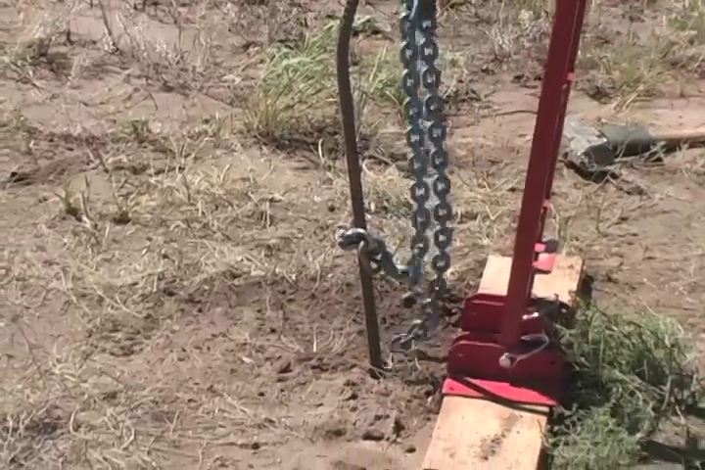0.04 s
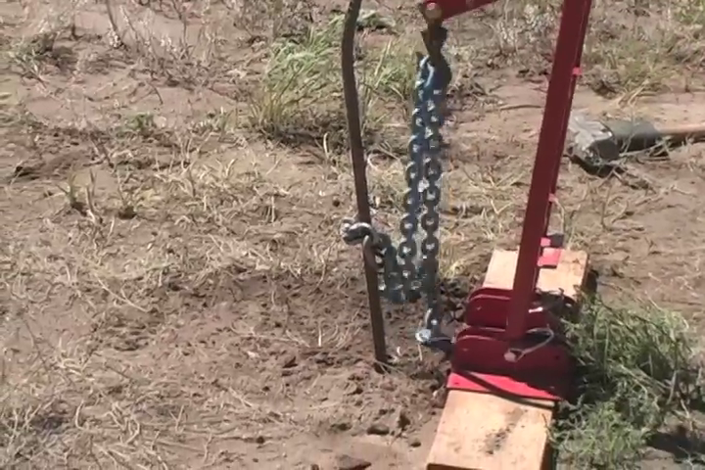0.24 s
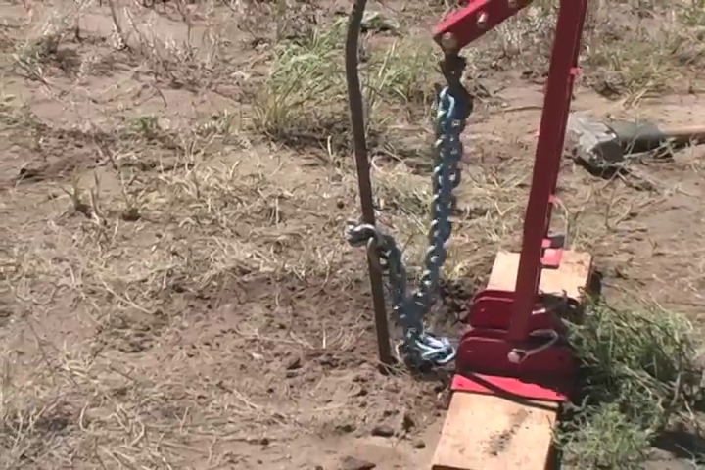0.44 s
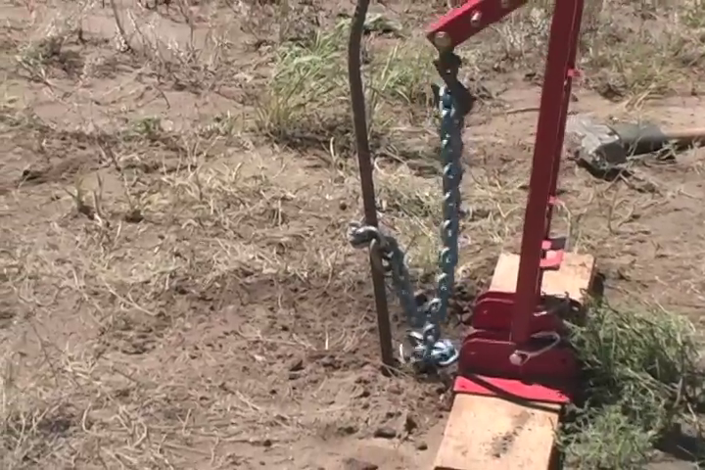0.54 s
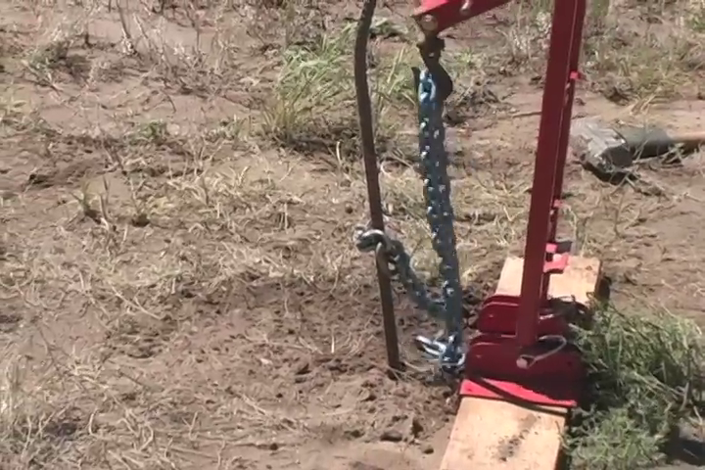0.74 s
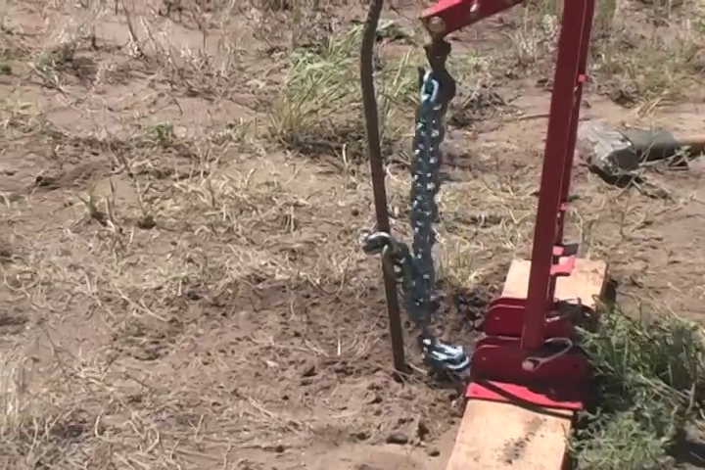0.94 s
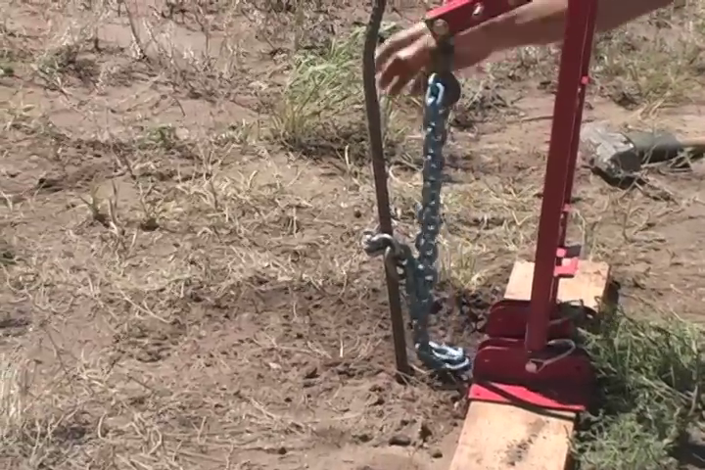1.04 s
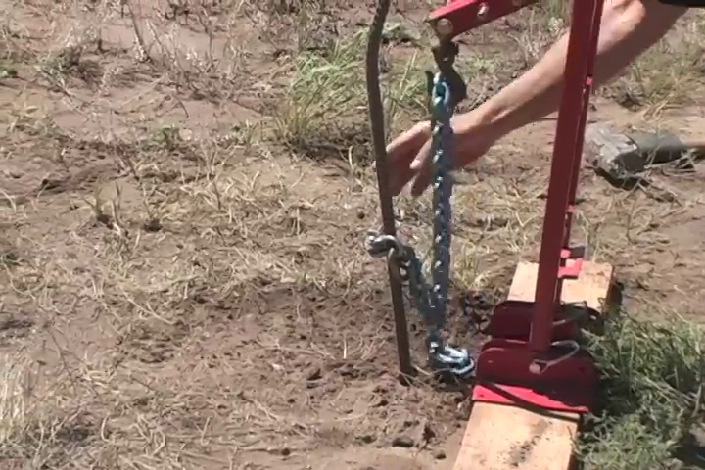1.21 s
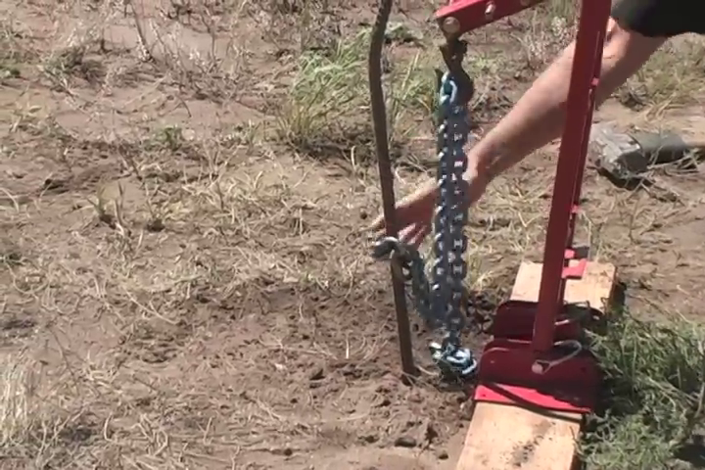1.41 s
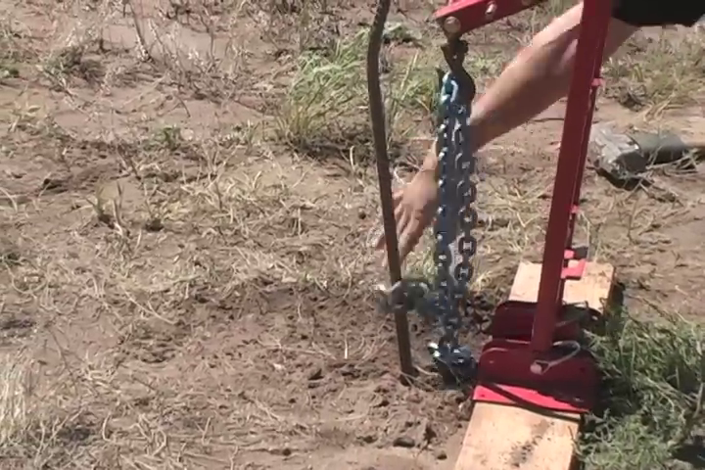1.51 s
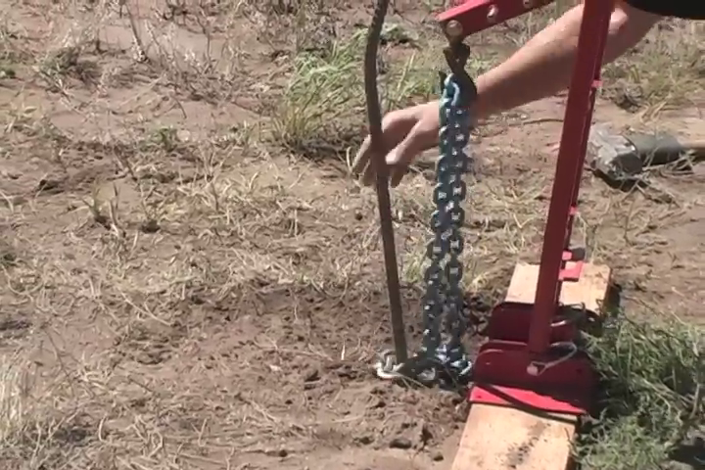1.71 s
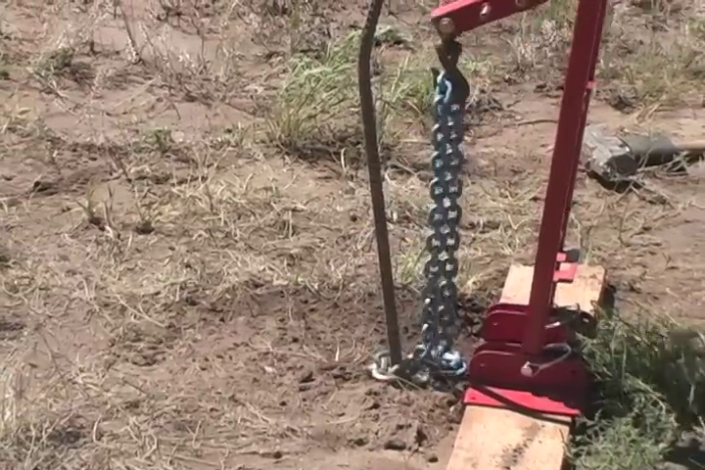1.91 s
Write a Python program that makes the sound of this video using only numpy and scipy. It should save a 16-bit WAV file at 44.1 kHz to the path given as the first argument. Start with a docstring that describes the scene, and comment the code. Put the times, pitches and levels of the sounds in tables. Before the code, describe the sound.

A steel chain drops slack, clinking and rattling against a metal jack and rod outdoors.

```python
"""A steel chain goes slack between a farm jack and a ground rod, outdoors on dry soil.
Its links drop in one crash, then clink: each hit is a crack, a chatter of rebounds and a dense ring.
Hook, jack and rod ring on in their own modes, over dry ticks of grit and a faint sliding hiss.
Afterwards a hand shifts the chain softly and a foot steps on the soil.
Behind it, in quiet open air, a small bird chirps and an engine hums far away."""
import sys
import numpy as np
from scipy import signal
from scipy.fft import rfft, irfft
from scipy.io import wavfile

SR = 44100
rng = np.random.default_rng(int(sys.argv[2]) if len(sys.argv) > 2 else 0)


def persist_wave(psi):
    """Save psi, clipped to +-1, as 16-bit WAV."""
    counts = np.round(np.clip(psi, -1, 1) * 32767).astype(np.int16)
    wavfile.write(sys.argv[1], SR, np.atleast_2d(counts).T)


N = 85995

# Edges of the five bands that voice each clink: f/Hz
BAND_EDGES_HZ = [450, 1500, 3000, 5000, 7500, 15000]
# Link hits, from crash to soft shift: t/s, relative level/dB, five band levels/dB, chatter t60/s
LINK_HITS = [(0.106, -34, -16.5, -13, -12, -12, -19, 0.22),
             (0.183, -30.5, -24, -11, -22, -11.5, -30, 0.073),
             (0.2289, -9, -29.5, -11, -33, -10, -14, 0.05),
             (0.2395, -12, -29.5, -24, -6.5, -9.5, -12, 0.15),
             (0.2536, -8.5, -27.5, -11.5, -15.5, -10, -16.5, 0.09),
             (0.2648, -14, -23, -17.5, -13.5, -10.5, -17, 0.11),
             (0.2878, -17, -23, -12.5, -10.5, -15, -25, 0.17),
             (0.3482, -16, -31.5, -16.5, -12, -41, -20.5, 0.045),
             (0.3701, -27.5, -12.5, -3, -16, -3.5, -34, 0.033),
             (0.3834, -16.5, -21.5, -14, -11, -7.5, -18.5, 0.085),
             (0.403, -24, -17, -12.5, -5, -32, -17, 0.1), (0.4482, -33.5, -12.5, -30, -20, -15, -25, 0.09),
             (0.4713, -14.5, -25, -21, -12, -9, -8.5, 0.1), (0.5644, -22, -15, -11.5, -7.5, -7, -17, 0.084),
             (0.5701, -14.5, -29, -17.5, -12.5, -14.5, -13, 0.1),
             (0.6049, -35.5, -17, -13, -11, -4, -9, 0.13),
             (0.634, -14.5, -34, -22, -18, -22.5, -22.5, 0.13),
             (0.6686, -29, -13.5, -5, -3.5, -7.5, -19, 0.15),
             (0.6999, -28.5, -17.5, -6.5, -24, -10, -15.5, 0.15),
             (0.716, -26, -15, -45, -6, -26, -5, 0.062), (0.7179, -15, -34, -23, -31, -8.5, -21, 0.066),
             (0.7627, -28.5, -12.5, -5.5, -42, -6.5, -20, 0.039),
             (0.8181, -31.5, -11.5, -10, -5.5, -10.5, -32, 0.074),
             (0.924, -21.5, -28, -9, -7, -7, -13, 0.075), (0.9266, -21.5, -17, -15, -11, -21, -14, 0.14),
             (1.001, -31, -13.5, -13.5, -5, -7, -19, 0.067),
             (1.4664, -36.5, -25.5, -33, -10.5, -18, -22, 0.068),
             (1.4861, -38.5, -21.5, -24.5, -6.5, -14, -24.5, 0.078),
             (1.5021, -35, -20.5, -32, -16.5, -18, -24.5, 0.051),
             (1.8992, -46, -36, -14, -7.5, -10, -31, 0.055)]
LINK_MODE_COUNT, CLINK_TRIM_DB = 140, -13.5
DETUNE = .012  # share by which a contact shifts the link modes


def chain():
    """Every collision excites the same crowd of link modes in a new mixture."""
    out = np.zeros(N)
    place = (np.arange(LINK_MODE_COUNT) + rng.random(size=LINK_MODE_COUNT)) / LINK_MODE_COUNT
    link_hz = BAND_EDGES_HZ[0] + (BAND_EDGES_HZ[-1] - BAND_EDGES_HZ[0]) * place ** 1.3
    for start, db, *band_db, t60 in LINK_HITS:
        detuned_hz = link_hz * (1 + DETUNE * rng.standard_normal(len(link_hz)))
        add(out, start, undb(db + CLINK_TRIM_DB) * clink(t60, band_db, detuned_hz))
    return out


# Bright steel EQ shared by all clinks: f/Hz, level/dB
CLINK_EQ = [(300, -20.5), (500, -7.5), (750, -6), (1100, -1.5), (2500, -2.5), (4000, 13.5), (6000, 1),
            (7300, 2.5), (8600, -2.5), (10000, 0.5), (12500, -1), (14000, -8), (16000, -25.5)]
ATTACK_S, CRACK_DB, CRACK_T60_S = 0.0013, 7.5, 0.004
CHATTER_DB, CHATTER_PER_S, CHATTER_SPREAD_DB = 3.5, 1100, 3.5
RING_STRETCH = 1.13  # the links ring about this many times as long as they chatter
TREBLE_DAMPING = 0.06  # higher link modes die sooner, as this power of frequency


def clink(t60, band_db, link_hz):
    """One collision: a crack, a chatter of tiny rebounds and the dense ring of the links."""
    t = np.arange(SR // 4) / SR
    strength, stretch, phase = rng.standard_normal((3, len(link_hz), 1))
    waves = np.sin(2 * np.pi * (link_hz[:, None] * t + phase))
    damping = (link_hz[:, None] / np.median(link_hz)) ** -TREBLE_DAMPING
    mode_t60 = t60 * RING_STRETCH * damping * np.exp(0.22 * stretch)
    ring = (strength * waves * fade(t, mode_t60)).sum(0) / np.sqrt(len(link_hz) / 2)
    contacts = rng.random(len(t)) < CHATTER_PER_S / SR
    rebounds = contacts * undb(CHATTER_SPREAD_DB * rng.standard_normal(len(t)))
    polarity = np.sign(rng.standard_normal(len(t)))
    chatter = undb(CHATTER_DB) * unit(rebounds * polarity) * fade(t, t60)
    crack = undb(CRACK_DB) * rng.standard_normal(len(t)) * fade(t, CRACK_T60_S)
    attack = 1 - np.exp(-t / ATTACK_S)
    hit = colour((ring + chatter + crack) * attack, CLINK_EQ)
    out = 0
    for lo, hi, db in zip(BAND_EDGES_HZ, BAND_EDGES_HZ[1:], band_db):
        band = signal.sosfilt(signal.butter(3, [lo, hi], "band", fs=SR, output="sos"), hit)
        out = out + undb(db) * band / np.std(band[:SR // 60])  # the onset sets the band's level
    return out


def struck_steel(modes, blows):
    """A steel part rings with its own modes, a little differently at each blow."""
    out, t = np.zeros(N), np.arange(SR * 3 // 4) / SR
    attack = 1 - np.exp(-t / ATTACK_S)
    for start, db in blows:
        variation = rng.standard_normal((len(modes), 2))
        ring = sum(undb(db + mode_db + jitter_db) * np.sin(2 * np.pi * (hz * t + phase)) * fade(t, t60)
                   for (hz, mode_db, t60), (jitter_db, phase) in zip(modes, variation))
        add(out, start, ring * attack)
    return out


# Ringing modes of the links, the hook and the jack's parts: f/Hz, relative level/dB, t60/s
LINK_MODES = [(2293, -9, 0.14), (3002, -26, 0.088), (3697, 2.5, 0.088), (3580, 0.5, 0.05),
              (4060, -1.5, 0.1), (4257, -5.5, 0.076), (4355, -7.5, 0.16), (4400, -15, 0.083),
              (5630, -16, 0.13), (5790, -5, .21), (6124, -6.5, .16), (6400, -3, 0.11), (7531, -21.5, 0.15),
              (13240, -11.5, 0.14)]
LOOSE_LINK_MODES = [(3710, -9, 0.046), (4770, 1, 0.023), (5010, -7.5, 0.066), (5870, 1, 0.024),
                    (6740, -4.5, 0.032), (8470, -13, 0.068), (9970, -8.5, 0.059)]
HOOK_MODES = [(1927, -17, 0.4), (5240, -15.5, 0.08), (5930, 4.5, 0.041), (6740, -7, 0.121),
              (10370, 2.5, 0.027), (12020, -22, 0.13)]
JACK_BASE_MODES = [(519, -12, .09), (981, -8.5, 0.084), (1143.4, 3.5, 0.091), (1300, -16, 0.064)]
JACK_ARM_MODES = [(2000, 2.5, 0.1435), (2620, -6.5, 0.067), (2940, 7, 0.17), (4290, -16.5, .07)]
JACK_POST_MODES = [(780, -15, .12), (1220, -5, 0.34), (1307, -2, .17), (2040, -4, .15), (4078, -2.5, 0.094)]
# Blows that set each part ringing: t/s, level/dB
LINK_BLOWS = [(.230, -27.5), (.2545, -34), (0.3724, -37), (0.4715, -36)]
LOOSE_LINK_BLOWS = [(0.5714, -40.5), (0.6341, -25), (0.93, -32.5)]
HOOK_BLOWS = [(0.354, -38), (0.3837, -40), (0.4485, -41.5), (.5705, -34), (.607, -38)]
JACK_BASE_BLOWS = [(0.242, -39), (0.3461, -47.5), (0.4736, -38), (0.925, -52.5)]
JACK_ARM_BLOWS = [(0.4053, -47), (0.6704, -43.5)]
JACK_POST_BLOWS = [(0.183, -51.5), (0.7205, -46.5), (0.8205, -53.5)]


def hardware():
    """The falling chain knocks bright pings from links and hook, and lower clanks from the jack."""
    return (struck_steel(LINK_MODES, LINK_BLOWS)
            + struck_steel(LOOSE_LINK_MODES, LOOSE_LINK_BLOWS)
            + struck_steel(HOOK_MODES, HOOK_BLOWS)
            + struck_steel(JACK_BASE_MODES, JACK_BASE_BLOWS)
            + struck_steel(JACK_ARM_MODES, JACK_ARM_BLOWS)
            + struck_steel(JACK_POST_MODES, JACK_POST_BLOWS))


# Ringing modes of the ground rod: f/Hz, relative level/dB, t60/s
ROD_MODES = [(3348, -12.5, 0.67), (3384, 2, 0.087), (4130, -28, 0.37), (5338, -13, 0.099),
             (6200, -14, 0.19), (7447, -1, 0.2), (9930, -4, .12)]
# Blows of the chain on the rod: t/s, level/dB
ROD_BLOWS = [(.565, -42), (0.7193, -32), (0.9264, -47.5), (1.003, -58)]
ROD_CHOKE_S, ROD_CHOKE_T60_S = 1.03, .15


def ground_rod():
    """The rod rings with a long tail until the chain settles against it and chokes it."""
    since_choke = np.maximum(np.arange(N) / SR - ROD_CHOKE_S, 0)
    return struck_steel(ROD_MODES, ROD_BLOWS) * fade(since_choke, ROD_CHOKE_T60_S)


# Dry ticks: t/s, peak level/dB, brightest f/Hz
GRIT_TICKS = [(0.1088, -45.5, 7860), (0.171, -40.5, 3600), (.184, -37.5, 4800), (0.2253, -37, 4500),
              (0.2269, -33, 2970), (0.2311, -17.5, 3800), (0.2544, -18.5, 3560), (0.362, -39, 8900),
              (.387, -30.5, 9400), (0.4061, -24, 3000), (.4732, -32, 4900), (0.6359, -22, 5500),
              (.679, -42, 10600), (0.69, -40, 10000), (0.7202, -16.5, 4370), (.830, -43, 11100),
              (.859, -40, 7900), (.866, -40, 7400), (1.057, -49, 5460), (1.1035, -42, 12600),
              (1.109, -43, 12600), (1.339, -44.5, 7000), (1.47, -46.5, 4170), (1.487, -55.5, 4000),
              (1.504, -46.5, 4300), (1.603, -53.5, 6000)]
TICK_Q, TICK_T60_S = 1.7, .0065


def grit():
    """Grit and hard contacts give tiny noise bursts, each with a broad resonance."""
    out, t = np.zeros(N), np.arange(SR // 20) / SR
    for start, db, hz in GRIT_TICKS:
        burst = rng.standard_normal(len(t)) * fade(t, TICK_T60_S)
        b, a = signal.iirpeak(hz, TICK_Q, fs=SR)
        tick = signal.lfilter(b, a, signal.lfilter(b, a, burst))
        add(out, start, undb(db) * tick / np.abs(tick).max())
    return out


# Envelope of the sliding hiss: t/s, level/dB
SLIDE_ENVELOPE = [(0, -79.5), (.6, -59.5), (1.0, -70.5), (1.1, -68), (1.36, -67), (1.45, -73),
                  (1.55, -85.5), (1.95, -74.5)]
# EQ of the sliding hiss: f/Hz, level/dB
SLIDE_EQ = [(1000, -9.5), (3000, -6.5), (5000, 2.5), (7500, -2.5), (11000, -7.5), (15000, -9)]


def slide():
    """A faint, bright hiss swells and ebbs as the chain slides."""
    return curve(SLIDE_ENVELOPE) * unit(colour(rng.standard_normal(N), SLIDE_EQ))


STEP_AT_S, STEP_DB, STEP_HZ, STEP_SWELL_S = 1.447, -62, 235, 0.014


def footstep():
    """A soft step on soil: one dull pulse of low noise."""
    swell = np.exp(-((np.arange(N) / SR - STEP_AT_S) / STEP_SWELL_S) ** 2)
    return undb(STEP_DB) * swell * narrow_noise(STEP_HZ, width_hz=36)


# Bird chirps: t/s, level/dB, starting f/Hz
CHIRPS = [(0.896, -62, 5470), (1.105, -79, 5500), (1.135, -66, 5550), (1.735, -70, 5560),
          (1.763, -67.5, 5600), (1.797, -68.5, 5600), (1.853, -73.5, 5540), (1.88, -65, 6000),
          (1.905, -71.5, 6000), (1.93, -76, 6200)]
CHIRP_LENGTH_S, CHIRP_FALL_HZ_PER_S = 0.017, 26400


def bird():
    """A small, distant bird gives short falling whistles."""
    out, t = np.zeros(N), np.arange(int(CHIRP_LENGTH_S * SR)) / SR
    for start, db, hz in CHIRPS:
        cycles = (hz - CHIRP_FALL_HZ_PER_S * t / 2) * t
        add(out, start, undb(db) * np.hanning(len(t)) * np.sin(2 * np.pi * cycles))
    return out


# Engine tones: f/Hz, level/dB
ENGINE_TONES = [(59.5, -68.5), (88, -69.5)]
# Swell riding on those tones: t/s, relative level/dB
ENGINE_SWELL = [(0, 4.5), (.3, -17), (.55, -2), (.85, -0.5), (1.25, -2.5), (1.45, -11.5), (1.95, -4.5)]


def engine():
    """A far engine hums on two low, wavering tones."""
    return curve(ENGINE_SWELL) * sum(undb(db) * narrow_noise(hz, width_hz=1.5) for hz, db in ENGINE_TONES)


# EQ of the open-air bed: f/Hz, relative level/dB
AIR_EQ = [(12, -51.5), (20, -21), (93, -6), (123, -8.5), (328, -13.5), (388, -18.5), (446, -15.5),
          (825, -28.5), (949, -22.5), (3250, -32.5), (5380, -37), (8410, -35), (14300, -34.5),
          (16000, -27.5)]
AIR_DB, AIR_SIDE_DB = -66.5, -14


def open_air():
    """A quiet bed of bass-heavy noise with a little stereo width."""
    mid, side = (undb(AIR_DB) * unit(colour(rng.standard_normal(N), AIR_EQ)) for _ in range(2))
    return mid + undb(AIR_SIDE_DB) * side * np.array([[1], [-1]])


def narrow_noise(hz, width_hz):
    """Noise in one band; the narrower it is, the more it sounds like a wavering tone."""
    f = np.fft.rfftfreq(N, 1 / SR)
    return unit(irfft(rfft(rng.standard_normal(N)) / (1 + ((f - hz) / width_hz) ** 2), N))


def colour(x, points):
    """Minimum-phase EQ through points of f/Hz, level/dB."""
    size = 2048
    hz, db = np.array(points).T
    gain = undb(np.interp(np.log(np.fft.rfftfreq(size, 1 / SR) + 1), np.log(hz), db))
    cepstrum = irfft(np.log(gain))
    cepstrum[1:size // 2] *= 2  # folded forward, so nothing rings ahead of a hit
    cepstrum[size // 2 + 1:] = 0
    impulse_response = irfft(np.exp(rfft(cepstrum)))
    return signal.fftconvolve(x, impulse_response)[:len(x)]


def curve(points):
    """Gain envelope over the whole scene from points of t/s, level/dB."""
    return undb(np.interp(np.arange(N) / SR, *np.array(points).T))


def fade(t, t60):
    """Exponential decay, 60 dB down after t60."""
    return np.exp(-np.log(1000) * t / np.maximum(t60, 1e-4))


def undb(db):
    """Decibels to gain."""
    return 10 ** (np.asarray(db) / 20)


def unit(x):
    """Scale to an rms of 1."""
    return x / np.sqrt(np.mean(x ** 2) + 1e-20)


def add(out, start, x):
    """Mix a sound in at a time in seconds."""
    i = max(int(start * SR), 0)
    out[i:i + len(x)] += x[:N - i]


STEEL_LOW_HZ = 430  # the steel sounds carry nothing below this
SCATTER_DB, SCATTER_T60_S, LEFT_OVER_RIGHT_DB = -13, .1, 3.05


def scene():
    """Rough ground scatters a short, weak echo of the steel; the whole mix sits a little to the left."""
    steel = ground_rod() + chain() + grit() + slide() + hardware()
    steel = signal.sosfilt(signal.butter(3, STEEL_LOW_HZ, "high", fs=SR, output="sos"), steel)
    t = np.arange(SR // 4) / SR
    echoes = rng.standard_normal((2, len(t))) * fade(t, SCATTER_T60_S)
    scatter = np.array([signal.fftconvolve(steel, echo / np.linalg.norm(echo))[:N] for echo in echoes])
    pan = undb(np.array([[1], [-1]]) * LEFT_OVER_RIGHT_DB / 2)
    return (steel + undb(SCATTER_DB) * scatter + footstep() + bird() + open_air() + engine()) * pan


WHINE_HZ, WHINE_DB, HIGH_CUT_HZ = 15600, -82.5, 16300


def record(dry):
    """A thin whine joins the mix, and a steep filter cuts the top."""
    whine = undb(WHINE_DB) * narrow_noise(WHINE_HZ, width_hz=3.7)
    return signal.sosfilt(signal.ellip(8, .2, 70, HIGH_CUT_HZ, fs=SR, output="sos"), dry + whine)


dry = scene()
out = record(dry)
persist_wave(out)
```